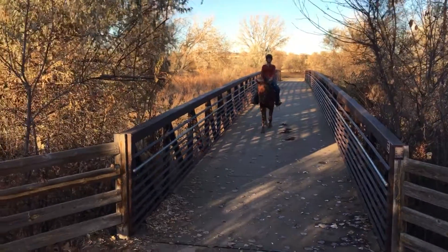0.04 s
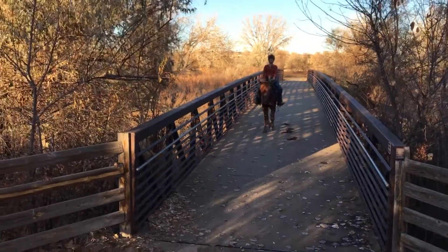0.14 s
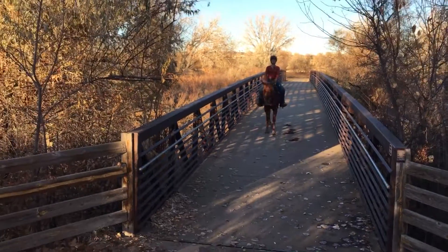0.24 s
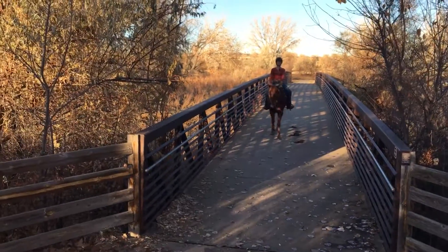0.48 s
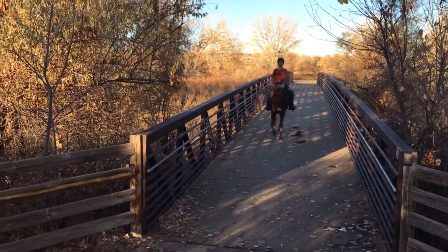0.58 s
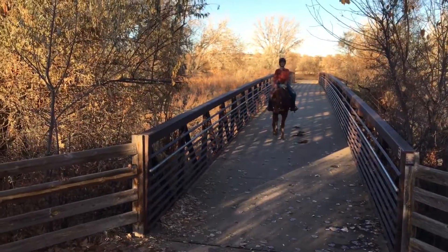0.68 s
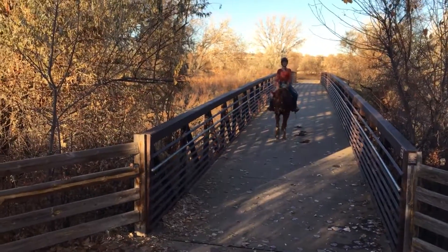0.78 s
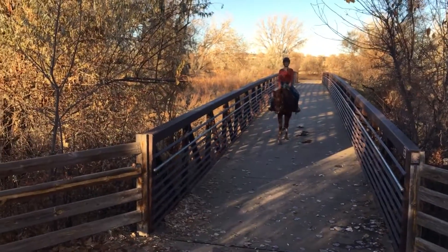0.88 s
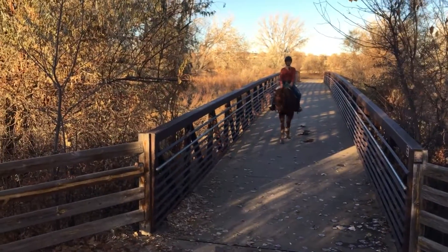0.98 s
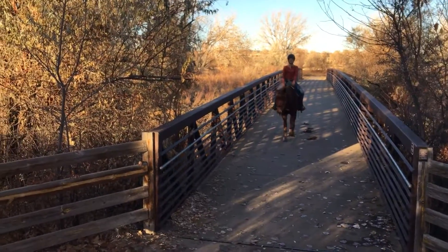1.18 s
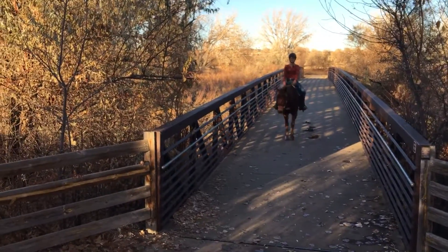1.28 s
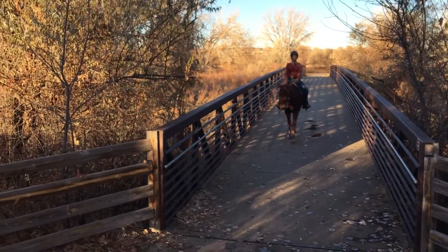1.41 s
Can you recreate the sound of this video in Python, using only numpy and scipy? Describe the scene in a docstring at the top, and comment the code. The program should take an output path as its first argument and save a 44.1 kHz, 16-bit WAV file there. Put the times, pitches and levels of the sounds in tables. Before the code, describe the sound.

A horse steps on a wooden bridge in still countryside, heard from the bridge's end. A small gritty scuff leads to one thudding clop, then softer crunches, plank knocks and buckle ticks fade into faint wind and hiss.

```python
"""On a wooden bridge in still, open country, a horse walks over the boards.
One hoof knocks, toe then heel, and the deck bends with a short thud that falls in pitch.
Before and after, grit and dry leaves crunch, loose planks knock and the bass bumps softly.
The tack (the horse's straps and buckles) ticks faintly and a small bird peeps once.
Light wind and an even hiss, both made of noise, lie under it all."""
import sys
import numpy as np
from scipy import signal
from scipy.io import wavfile

SR = 44100
rng = np.random.default_rng(int(sys.argv[2]) if len(sys.argv) > 2 else 0)


def master(y):
    """Save y as 16-bit WAV."""
    cut = np.clip(np.atleast_2d(y).T, -1, 1)
    pcm = np.round(cut * 32767)  # scale
    wavfile.write(sys.argv[1], SR, pcm.astype(np.int16))


N = 63945
TIME = np.arange(N) / SR


def from_db(db):
    """Turn decibels into a number to multiply by."""
    return 10 ** (np.asarray(db) / 20)


def rms_one(x):
    """Scale a sound so that its average strength (rms) is 1."""
    return x / np.sqrt(np.mean(x ** 2) + 1e-20)


def at_hz(points, hz):
    """Read the level at one pitch from (f/Hz, level/dB) points, spaced by octaves."""
    pitches, levels = np.transpose(points)
    return np.interp(np.log(hz), np.log(pitches), levels)


def low_pass(x, hz):
    """Soften the treble above hz."""
    return signal.sosfilt(signal.butter(2, hz, fs=SR, output="sos"), x)


def band_pass(x, low_hz, high_hz, order=2):
    """Keep mainly what lies between two pitches."""
    return signal.sosfilt(signal.butter(order, [low_hz, high_hz], "band", fs=SR, output="sos"), x)


def swell(middle, half_length):
    """A bell-shaped rise and fall; both times are in seconds."""
    return np.exp(-((TIME - middle) / half_length) ** 2)


def struck(start, hz, t60):
    """A pure tone that starts and dies away; t60 is the time it takes to fade by 60 dB."""
    age = np.maximum(TIME - start, 0)
    return np.sin(2 * np.pi * hz * age) * from_db(-60 * age / t60)


def ring(clicks, hz, t60):
    """Each click sets off a fading tone as strong as the click."""
    decay, step = from_db(-60 / (t60 * SR)), 2 * np.pi * hz / SR
    return signal.lfilter([0, np.sin(step)], [1, -2 * decay * np.cos(step), decay ** 2], clicks + 1e-18)


def drift(turns_per_s):
    """A random wander with a typical size of 1."""
    points = rng.standard_normal(256)
    return rms_one(np.interp(TIME * turns_per_s, np.arange(len(points)), points))


def banded_noise(spectrum, edges, flicker_db):
    """Bands of noise that each flicker on their own; any near 239 Hz also rise and fall together."""
    # rise and fall of the low mids: t/s, level/dB
    low_mid_level = [(0, -0.5), (.36, -0.5), (.5, 2), (.56, -1), (.68, -0.5), (.75, 1), (1.0, .5),
                     (1.45, 0)]
    low_mid_db = np.interp(TIME, *np.transpose(low_mid_level))
    total, white = 0, rng.standard_normal((2, N + SR))
    for k, (low, high) in enumerate(zip(edges, edges[1:])):
        band = band_pass(white[k % 2], low, high)[SR:]   # skip a second while the filter settles
        hz = np.sqrt(low * high)
        low_mid_share = np.exp(-np.log2(hz / 239) ** 2)
        wander_db = low_mid_share * low_mid_db + flicker_db * drift(turns_per_s=13.97)
        total = total + band * from_db(at_hz(spectrum, hz) + wander_db)
    return rms_one(total)


def wind():
    """Light wind rumbles low down and eases a little."""
    # tone of the wind: f/Hz, relative level/dB
    spectrum = [(20, -42), (35, -4.5), (54, 1), (85, -9.5), (120, -5.5), (165, -4.5), (225, -11),
                (330, -13), (480, -18), (800, -16.5), (1400, -25.5), (3000, -40.5)]
    # strength of the wind: t/s, level/dB
    strength = [(0, -51.5), (.14, -51), (.4, -50), (.75, -53.5), (.9, -52.5), (1.25, -52.5), (1.45, -54)]
    rumble = banded_noise(spectrum, np.geomspace(18, 3000, 23), flicker_db=1.82)
    return from_db(np.interp(TIME, *np.transpose(strength))) * rumble


def hiss():
    """Faint, smooth, high noise fills the background."""
    # tone of the hiss: f/Hz, relative level/dB
    spectrum = [(820, -31), (1400, -14), (1560, -2), (2670, -4.5), (3130, -2.5), (3570, -3), (4150, -3.5),
                (4970, -7), (5390, -4.5), (9000, -8.5), (10400, -12.5), (11700, -11.5), (15500, -18)]
    return from_db(-61) * banded_noise(spectrum, np.geomspace(1400, 17000, 20), flicker_db=0.45)


def scuffs():
    """Hooves scuff grit and dry leaves: thousands of tiny ringing clicks blur into a crunch."""
    # scuffs on the deck: middle t/s, half length/s, level/dB
    strokes = [(0.014, 0.068, -52), (0.514, 0.076, -62.5)]
    # tone of the grains: f/Hz, relative level/dB
    colour = [(350, -5), (600, 4), (1000, -0.5), (1900, 11), (2600, 7), (3300, -4), (6000, -18)]
    grains_per_s, ring_cycles, spread_db = 9000, 3, .5
    sizes = from_db(spread_db * np.minimum(rng.exponential(1, N), 4))
    signs = rng.choice([-1, 1], N)
    clicks = sizes * signs * (rng.random(N) < grains_per_s / SR)
    pitches = np.geomspace(350, 6000, 18)
    pitch_choice = rng.integers(0, len(pitches), N)
    crunch = sum(from_db(at_hz(colour, hz)) * ring(clicks * (pitch_choice == k), hz, ring_cycles / hz)
                 for k, hz in enumerate(pitches))
    pressure = sum(from_db(db) * swell(middle, half_length) for middle, half_length, db in strokes)
    return rms_one(crunch) * pressure


def crack(start, db, hz, t60, crumble_db=-3):
    """One ringing snap with a brief crumble of noise around the same pitch."""
    age, crumble_s = TIME - start, 0.0043
    snap = struck(start, hz, t60)
    burst = rng.standard_normal(N) * (age > 0) * np.exp(-np.abs(age) / crumble_s)
    crumble = rms_one(band_pass(burst + 1e-18, hz / 2, hz * 2, order=1))
    return from_db(db) * (snap + from_db(crumble_db) * np.std(snap) * crumble)


def grit():
    """Single bits of grit crack under the hooves and stand out of the crunch."""
    # cracks: t/s, level/dB, f/Hz, t60/s, crumble compared with snap/dB
    cracks = [(.0148, -36, 1000, .008, -5), (.0482, -36.5, 1010, .012, -8), (.0738, -41, 1210, .012, -4),
              (.0858, -42.5, 1750, .010, -2), (.1007, -38.5, 1380, .011, -9), (.122, -47, 2100, .006, 0),
              (.372, -46, 1120, .010, -4), (.386, -43, 1000, .006, -3), (.408, -47, 1010, .008, 0),
              (.4232, -37.5, 1800, .005, -2), (.4248, -40, 1150, .005, -4), (.438, -45, 1400, .008, -1),
              (.4588, -32.5, 1080, .0055, -7), (.484, -45, 1150, .009, -2), (.503, -44, 864, .010, -2),
              (.510, -46, 3200, .010, -2), (.520, -41.5, 1000, .009, -2), (.538, -42.5, 1250, .011, -2),
              (.561, -44, 1070, .010, -3), (.583, -45, 1150, .009, -3), (.617, -45, 980, .012, -4),
              (.786, -48, 900, .008, 0)]
    return low_pass(sum(crack(*row) for row in cracks), hz=4440)


def planks():
    """Loose boards give faint, hollow knocks as the weight shifts."""
    # knocks: t/s, level/dB, f/Hz, t60/s
    knocks = [(.040, -45, 352, .13), (.4235, -45, 330, .03), (.4592, -44, 400, .02), (.466, -46, 185, .06),
              (.7225, -45, 165, .14), (1.245, -44, 200, .05)]
    return sum(from_db(db) * struck(start, hz, t60) for start, db, hz, t60 in knocks)


def bumps():
    """Short, dull swells of bass."""
    # soft bumps: middle t/s, level/dB, f/Hz, half length/s
    swells = [(.046, -45, 100, .014), (.203, -39.5, 100, .011), (.313, -45, 110, .011),
              (.417, -47, 115, .012), (.470, -41, 78, .013), (.487, -45, 58, .016), (.556, -47, 52, .018),
              (.617, -49, 95, .007), (.747, -46, 58, .025), (.849, -43, 58, .012), (.999, -41, 76, .009),
              (1.128, -46, 53, .058), (1.273, -43, 85, .012)]
    return sum(from_db(db) * swell(middle, half_length) * np.cos(2 * np.pi * hz * (TIME - middle))
               for middle, db, hz, half_length in swells)


def thud():
    """The deck bends under the weight: short waves arrive before long ones, so the pitch falls."""
    start_s, attack_s, hold_s, release_s = .2665, 0.0073, 0.0079, .0145
    start_hz, end_hz, glide_after_s, glide_s = 217, 83, .0078, .0026
    age = np.maximum(TIME - start_s, 0)
    hz = end_hz + (start_hz - end_hz) * np.exp(-np.maximum(age - glide_after_s, 0) / glide_s)
    phase = 2 * np.pi * np.cumsum(hz * (age > 0)) / SR
    rise = np.minimum(age / attack_s, 1)
    fall = np.exp(-(np.maximum(age - attack_s - hold_s, 0) / release_s) ** 2)
    overtone = from_db(-8.5) * np.minimum(age / .02, 1)   # grows as the weight comes down
    return from_db(-24) * rise * fall * (np.sin(phase) + overtone * np.cos(2 * phase))


def clop():
    """Each touch of the hoof makes the plank ring and leaves a short, woody tail of noise."""
    # toe, a slip, then heel: t/s, level/dB, treble limit f/Hz (higher sounds harder)
    contacts = [(0.2694, -29, 2900), (0.2762, -46, 3500), (0.2825, -35, 3800)]
    # ringing tones of hoof on plank: f/Hz, relative level/dB, t60/s
    tones = [(638, -4.5, 0.019), (950, 2, 0.011), (1300, -0.5, 0.0076), (1830, -4, 0.0081),
             (3120, -5, 0.0023)]
    tail_db, tail_t60 = -22, 0.043
    knocks, tail_level = 0, 0
    for start, db, top_hz in contacts:
        knock = sum((-1) ** k * from_db(db + tone_db) * struck(start, hz, t60)
                    for k, (hz, tone_db, t60) in enumerate(tones))
        knocks = knocks + low_pass(knock + 1e-18, top_hz)
        fade_db = 60 * np.abs(TIME - start) / tail_t60
        tail_level = tail_level + (TIME > start) * from_db(db + tail_db - fade_db)
    woody_noise = rms_one(band_pass(rng.standard_normal(N), low_hz=575, high_hz=2120))
    return knocks + tail_level * woody_noise


def tack():
    """Buckles give tiny bright ticks, each with a duller, quieter body."""
    # buckle ticks: t/s, level/dB, f/Hz
    ticks = [(.3292, -41, 4500), (.7970, -43, 4900), (.8430, -40.5, 4700)]
    t60, body_hz, body_db = .004, 1410, -5
    ticking = sum(crack(start, db, hz, t60) + crack(start, db + body_db, body_hz, t60)
                  for start, db, hz in ticks)
    return low_pass(ticking, hz=7000)


def bird():
    """One thin, distant peep with a faint echo among the trees."""
    middle_s, half_length_s, pitch_hz = .640, 0.0053, 6870
    echo_db, echo_t60 = -5, .1
    age = TIME - middle_s
    flutter = rms_one(low_pass(rng.standard_normal(N), hz=125))
    echo = from_db(echo_db - 60 * np.abs(age) / echo_t60) * (age > 0) * flutter
    return from_db(-56.5) * (swell(middle_s, half_length_s) + echo) * np.sin(2 * np.pi * pitch_hz * TIME)


def scene():
    """Everything as heard from the end of the bridge, in one channel."""
    horse = clop() + thud() + bumps() + planks() + scuffs() + grit() + tack()
    return (horse + bird() + wind() + hiss())[None]


def record(dry):
    """The very highest treble is cut off steeply."""
    cutoff_hz = 15720
    return signal.sosfilt(signal.ellip(12, .1, 80, cutoff_hz, fs=SR, output="sos"), dry)


dry = scene()
out = record(dry)
master(out)
```